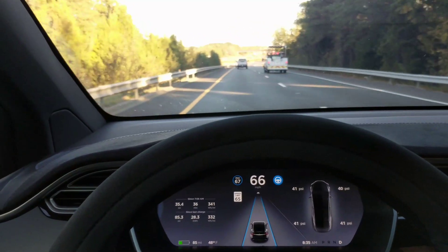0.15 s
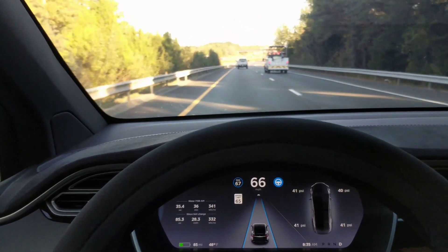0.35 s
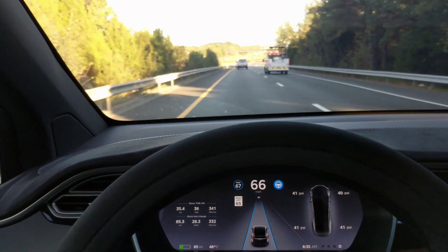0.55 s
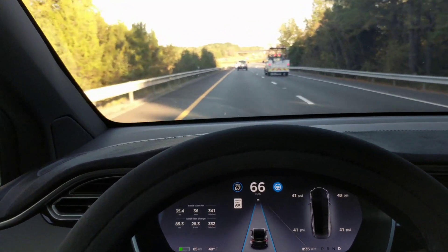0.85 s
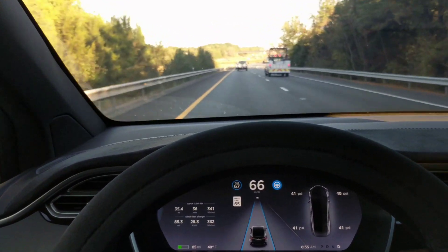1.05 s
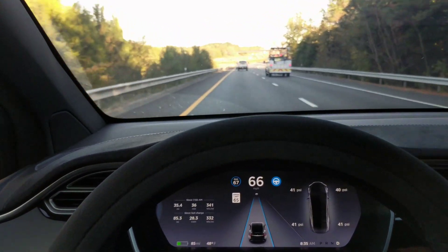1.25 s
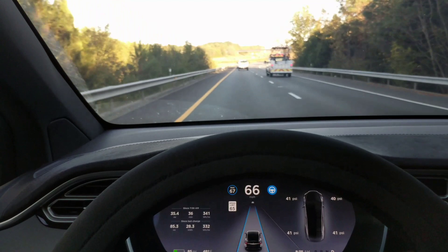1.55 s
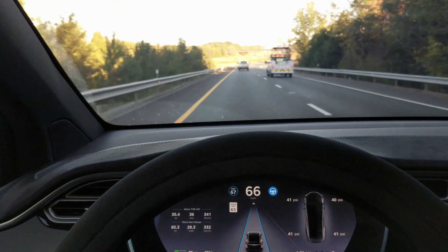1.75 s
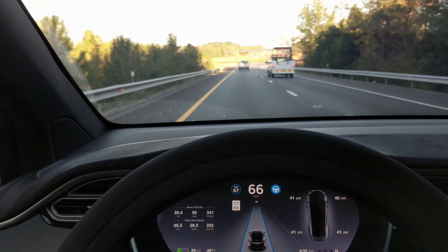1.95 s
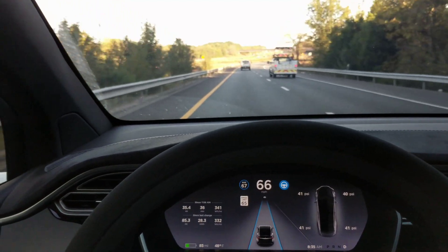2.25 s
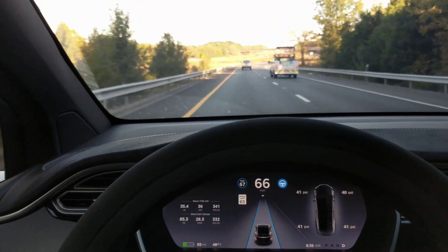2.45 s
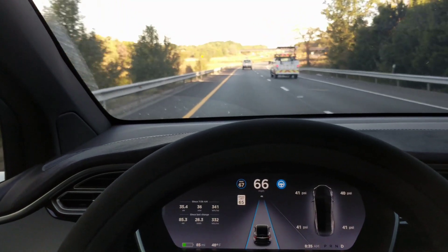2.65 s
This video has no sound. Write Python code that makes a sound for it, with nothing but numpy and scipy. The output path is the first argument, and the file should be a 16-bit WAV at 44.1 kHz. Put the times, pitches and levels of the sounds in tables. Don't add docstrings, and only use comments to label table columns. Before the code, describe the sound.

Low, steady tyre rumble and cabin boom inside a closed electric car at highway speed

```python
import sys
import numpy as np
from scipy import signal
from scipy.fft import rfft, irfft, next_fast_len
from scipy.io import wavfile

SR = 44100
rng = np.random.default_rng(int(sys.argv[2]) if len(sys.argv) > 2 else 0)


def attenuation_scalar(level_db):
    decades = np.asarray(level_db, float) / 20
    return 10 ** decades


def waveform_to_disk(signal):
    frames = np.transpose(np.atleast_2d(signal))
    scaled = np.clip(frames, -1, 1) * 32767
    samples = np.round(scaled).astype(np.int16)
    wavfile.write(sys.argv[1], SR, samples)


N = 123479


def rms_one(x):
    return x / np.sqrt(np.mean(x ** 2) + 1e-20)


def in_time(rows):
    s, value = np.transpose(rows)
    return np.interp(np.arange(N) / SR, s, value)


def drift(rate_hz):
    r = np.exp(-80 * np.pi * rate_hz / SR)
    white = rng.standard_normal(N // 40 + 2002)
    slow = signal.lfilter([1], [1, -2 * r, r * r], white)[2000:]
    return np.interp(np.arange(N) / 40, np.arange(len(slow)), rms_one(slow))


def resonate(x, hz, width_hz):
    r = np.exp(-np.pi * width_hz / SR)
    turn = 2 * r * np.cos(2 * np.pi * hz / SR)
    return signal.lfilter([(1 - r * r) / 2, 0, (r * r - 1) / 2], [1, -turn, r * r], x)


def ringing_noise(hz, width_hz, even):
    white = rng.standard_normal(N + SR // 2)
    each_hz = width_hz * 1.55
    hum = rms_one(resonate(resonate(white, hz, each_hz), hz, each_hz)[-N:])
    envelope = np.abs(signal.hilbert(hum, next_fast_len(N))[:N]) + .05
    return rms_one(hum / envelope ** np.clip(even, 0, 1))


def banded_noise(spectrum, patchy_db):
    hz, db = np.transpose(spectrum)
    size = next_fast_len(N + SR // 2)
    bin_hz = np.arange(size // 2 + 1) * SR / size
    colour = attenuation_scalar(np.interp(np.log(bin_hz + 1), np.log(hz), db))
    together = drift(1.0)
    noise = irfft(rfft(rng.standard_normal((2, size))) * colour, size)
    edges = 25 * 2 ** np.arange(0, 9.5, 1 / 3)
    out = 0
    for k, (low, high) in enumerate(zip(edges, edges[1:])):
        flicker = together + drift(42.0)
        if hz[0] < np.sqrt(low * high) < hz[-1]:
            bandpass = signal.butter(2, [low, high], "band", fs=SR, output="sos")
            band = signal.sosfilt(bandpass, noise[k % 2])[-N:]
            out = out + attenuation_scalar(patchy_db * flicker) * band
    return rms_one(out)


# start_s, level_db
ROAD_ROUGHNESS = [(0.0, -28.5), (0.03, -31), (0.31, -37.5), (0.63, -31.5), (0.67, -58), (0.7, -32.5),
                  (0.85, -32), (0.91, -43), (0.94, -35), (1.04, -31), (1.44, -35.5), (2.08, -35),
                  (2.15, -23.5), (2.25, -39.5), (2.27, -29), (2.4, -29.5), (2.76, -33.5), (2.8, -19.5)]


def cabin_boom():
    return attenuation_scalar(in_time(ROAD_ROUGHNESS) - 1) * ringing_noise(hz=75, width_hz=7, even=.9)


# start_s, level_db
SUSPENSION_TRAVEL = [(0.0, -49), (0.17, -34), (0.22, -43), (0.25, -39), (0.65, -45), (0.66, -40.5),
                     (1.08, -34.5), (1.12, -48), (1.17, -33.5), (1.53, -46), (1.84, -37), (1.98, -58),
                     (2.03, -34.5), (2.17, -46), (2.68, -36), (2.74, -45)]


def floor_shake():
    return attenuation_scalar(in_time(SUSPENSION_TRAVEL) + 3.1) * ringing_noise(hz=49.5, width_hz=15.2, even=0.6)


# pitch_hz, width_hz, level_db, follows_roughness_0_to_1
PANEL_MODES = [(91.9, 8.2, -43.5, 0.43), (102.1, 16, -42.5, 0.5), (128.8, 14.3, -39, 0),
               (158.3, 24, -45.5, 0), (187.9, 18, -53, 0.9), (257, 4.1, -58, .05), (313.9, 52, -47.5, .05),
               (371, 40, -47, 0.3), (437, 22, -67.5, .05)]


def panels():
    roughness_db = in_time(ROAD_ROUGHNESS)
    swing_db = roughness_db - roughness_db.mean()
    out = np.zeros(N)
    for hz, width_hz, db, follows in PANEL_MODES:
        out += attenuation_scalar(db + follows * swing_db) * ringing_noise(hz, width_hz, even=0.32)
    return out


# pitch_hz, level_db_per_hz
ROLL_COLOUR = [(28, -4), (42, -10.5), (65, -4), (110, -5), (150, -10.5), (240, -13), (500, -19.5),
               (650, -19)]


def roll_noise():
    return attenuation_scalar(-39) * banded_noise(ROLL_COLOUR, patchy_db=0)


# start_s, level_db
TREAD_LEVEL = [
    (0.0, -45),
    (0.01, -40),
    (0.29, -42),
    (0.49, -40.5),
    (0.69, -42),
    (0.83, -41),
    (2.76, -39.5),
    (2.78, -42),
]
# pitch_hz, width_hz, level_db (re tread)
TREAD_MODES = [(940, 51, -14), (1110, 66, -14), (1190, 45, -14), (1351, 59, -20), (1440, 51, -22),
               (1545, 31, -19.5), (1708, 31, -27), (2670, 170, -31.5)]
# pitch_hz, level_db_per_hz
ROAR_COLOUR = [(450, -6.5), (640, -2.5), (850, -1), (1250, -4.5), (1950, -12.5), (2300, -14), (3000, -23.5),
               (4500, -33)]


def tread_roar():
    roar = attenuation_scalar(-3) * banded_noise(ROAR_COLOUR, patchy_db=0.59)
    for hz, width_hz, db in TREAD_MODES:
        roar += attenuation_scalar(db + 1.2 * drift(3.9)) * ringing_noise(hz, width_hz, even=0.15)
    return attenuation_scalar(in_time(TREAD_LEVEL)) * roar


# start_s, level_db
SINGING_LEVEL = [(0.0, -46), (0.61, -44), (0.64, -53.5), (0.96, -44.5), (0.97, -40.5), (1.12, -52),
                 (1.55, -42.5), (1.59, -48.5), (1.79, -45.5), (1.82, -51), (2.07, -44), (2.27, -48.5),
                 (2.39, -45.5), (2.52, -49), (2.55, -44.5), (2.8, -47)]
# pitch_hz, width_hz, level_db (re swelling)
TREAD_TONES = [
    (721.5, 16, -3.5),
    (789.4, 38, -2.5),
]


def singing_tread():
    tones = sum(attenuation_scalar(db) * ringing_noise(hz, width_hz, even=0.58) for hz, width_hz, db in TREAD_TONES)
    return attenuation_scalar(in_time(SINGING_LEVEL)) * tones


# start_s, level_db
GUST_LEVEL = [(0, -75), (.6, -75.5), (.95, -75), (1.3, -76.5), (1.52, -72.5), (1.7, -73.5), (1.95, -73.5),
              (2.2, -73), (2.35, -74.5), (2.55, -75), (2.8, -75.2)]
# pitch_hz, level_db_per_hz
WIND_COLOUR = [(2500, 3), (3800, -1.5), (5000, -5.5), (6300, -11), (7300, -20), (9500, -24)]


def wind():
    return attenuation_scalar(in_time(GUST_LEVEL) + 7.5) * banded_noise(WIND_COLOUR, patchy_db=-0.1)


# start_s, peak_level_db
TRIM_CREAKS = [
    (0.3416, -51.5),
    (1.4306, -60),
]
# pitch_hz, level_db, t60_s
TRIM_MODES = [(3920, 0, 0.01), (4350, -1, .009), (5470, -6.5, .009), (6300, -5.5, .009), (7700, -9, .008),
              (9300, -10.5, .007), (10500, -9.5, .007), (11500, -11.5, .006), (13200, -15, .005)]


def trim_creaks():
    touches = [(0, 2), (.0012, -5), (.0029, -0.5)]
    out = np.zeros(N)
    for hz, mode_db, t60 in TRIM_MODES:
        clicks = np.zeros(N)
        for s, db in TRIM_CREAKS:
            for delay, touch_db in touches:
                strength = attenuation_scalar(db + mode_db + touch_db - 2)
                clicks[int((s + delay) * SR)] = strength * rng.choice([-1, 1])
        r = attenuation_scalar(-60 / (t60 * SR))
        w = 2 * np.pi * hz / SR
        out += signal.lfilter([0, np.sin(w)], [1, -2 * r * np.cos(w), r * r], clicks + 1e-18)
    return out


# start_s, peak_level_db
LENS_STEPS = [(.3022, -61), (.3685, -62), (.4110, -61), (.4648, -60), (1.5640, -60), (1.6248, -59.5),
              (1.6650, -60), (1.7013, -60.5), (2.5639, -60), (2.6042, -61), (2.6648, -59.5), (2.7049, -60)]
# delay_s, level_db, pitch_hz
LENS_TICKS = [
    (0, 2, 8500),
    (.0041, -8, 8500),
    (.0121, 1, 9200),
]


def lens_drive():
    width_hz = 4000
    s, db = np.transpose(LENS_STEPS)
    scatter_db = rng.normal(0, 1, (len(s), len(LENS_TICKS)))
    out = np.zeros(N)
    for k, (delay, tick_db, hz) in enumerate(LENS_TICKS):
        clicks = np.zeros(N)
        at = ((s + delay) * SR).astype(int) - 4
        clicks[at] = attenuation_scalar(db + tick_db + scatter_db[:, k])
        tick = resonate(resonate(clicks + 1e-18, hz, width_hz), hz, width_hz)
        out += tick * np.e * SR / (2 * np.pi * width_hz)
    return attenuation_scalar(3) * out


# start_s, pitch_hz
WHINE_PITCH = [(0, 11800), (.15, 11880), (.28, 11780), (.36, 12080), (.55, 12230), (.72, 12130),
               (.95, 12030), (1.05, 12230), (1.15, 12010), (1.26, 12050), (1.32, 12250), (1.46, 12290),
               (1.62, 12060), (2.05, 11990), (2.35, 12170), (2.53, 12430), (2.66, 12170), (2.8, 12300)]


def sensor_whine():
    frames_per_s, centre, duty = 29.97, .56, .4
    frame = np.arange(N) / SR * frames_per_s
    place = ((frame - centre + .5) % 1 - .5) / duty
    jitter_hz = 55 * drift(24.0)
    sag_hz = 120 * np.clip(place, -.5, .5)
    hz = in_time(WHINE_PITCH) + jitter_hz - sag_hz
    gate = np.clip(4.5 * (.62 - np.abs(place)), 0, 1)
    return attenuation_scalar(-82 + 1.3 * drift(9.0)) * gate * np.sin(2 * np.pi * np.cumsum(hz) / SR)


# pitch_hz, level_db_per_hz
HISS_COLOUR = [(3500, -5), (5000, -1.8), (9000, 0.8), (13000, -1.5), (17500, 2)]


def microphone_hiss():
    return attenuation_scalar(-75) * banded_noise(HISS_COLOUR, patchy_db=.1)


def scene():
    car = cabin_boom() + floor_shake() + panels() + roll_noise()
    tyres = tread_roar() + singing_tread()
    camera = lens_drive() + sensor_whine() + microphone_hiss()
    return (car + tyres + wind() + trim_creaks() + camera)[None]


def low_pass(x):
    return signal.sosfilt(signal.butter(12, 15750, fs=SR, output="sos"), x)


def record(dry):
    bass_cut = signal.butter(3, 30, "high", fs=SR, output="sos")
    mix = signal.sosfilt(bass_cut, dry)
    return low_pass(mix)


dry = scene()
out = record(dry)
waveform_to_disk(out)
```